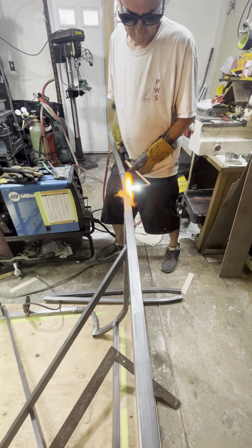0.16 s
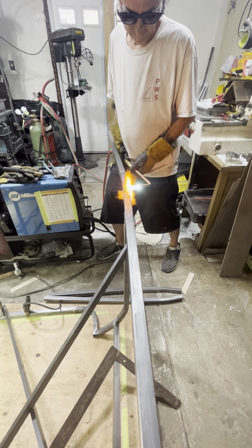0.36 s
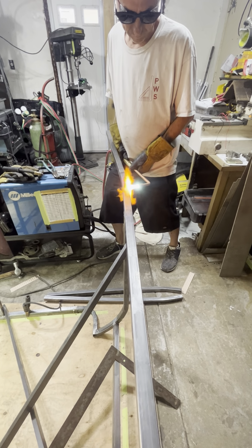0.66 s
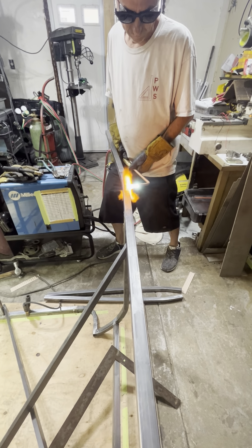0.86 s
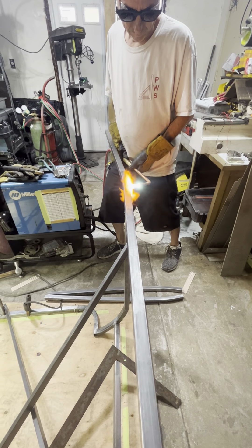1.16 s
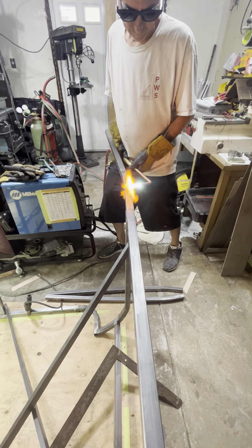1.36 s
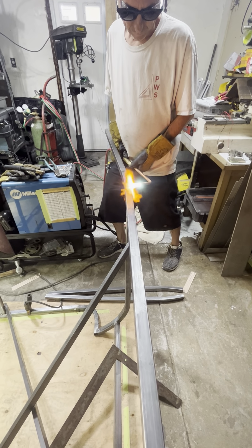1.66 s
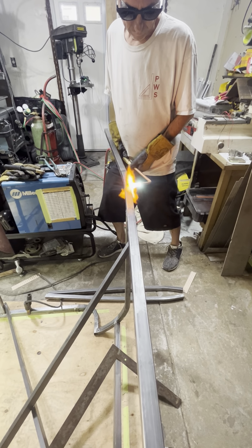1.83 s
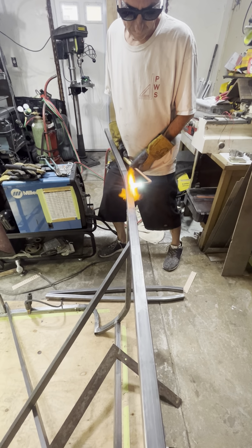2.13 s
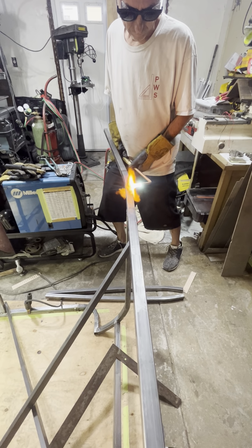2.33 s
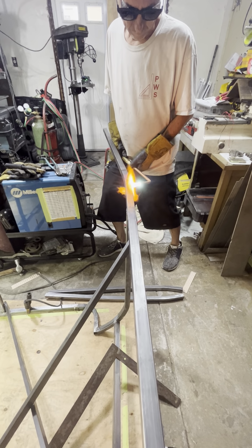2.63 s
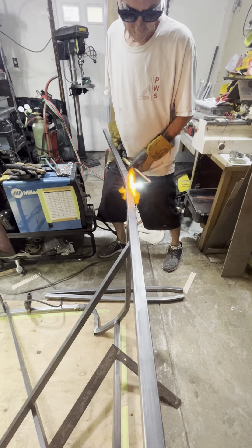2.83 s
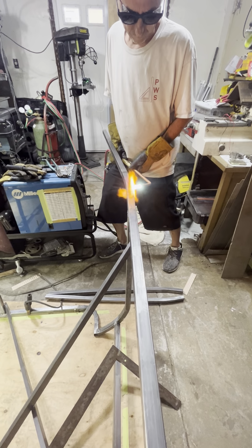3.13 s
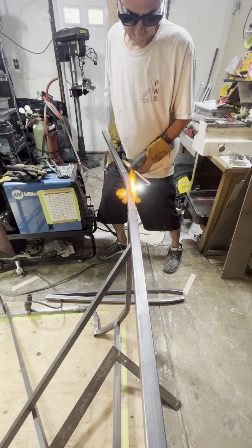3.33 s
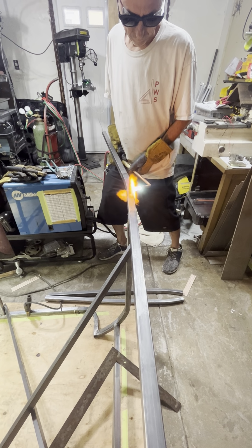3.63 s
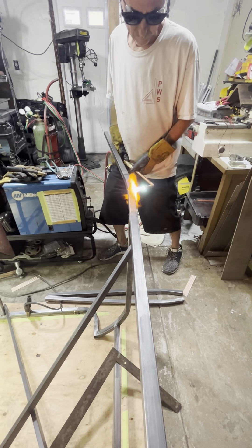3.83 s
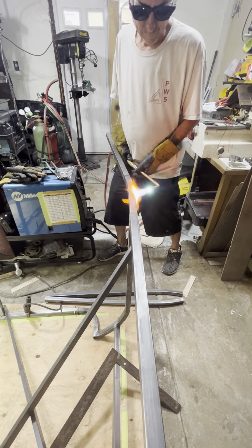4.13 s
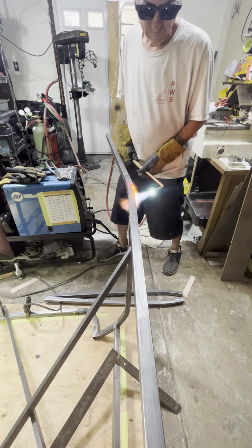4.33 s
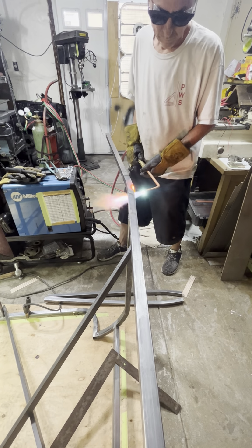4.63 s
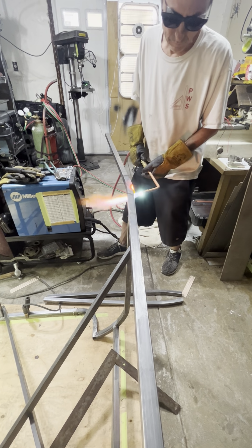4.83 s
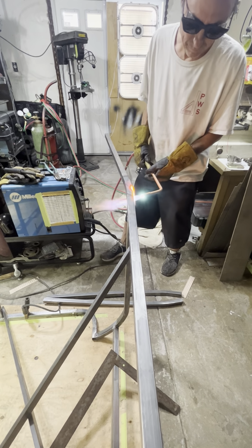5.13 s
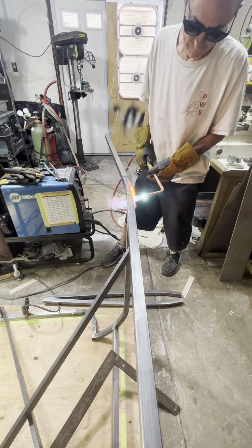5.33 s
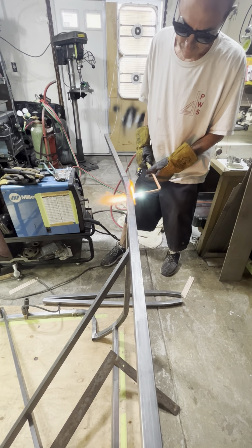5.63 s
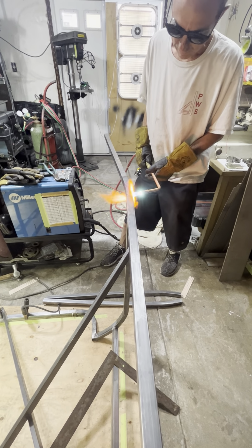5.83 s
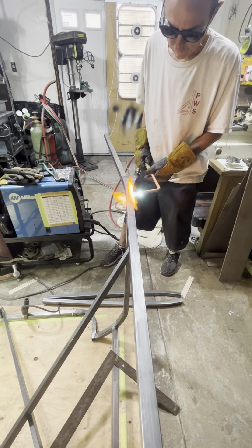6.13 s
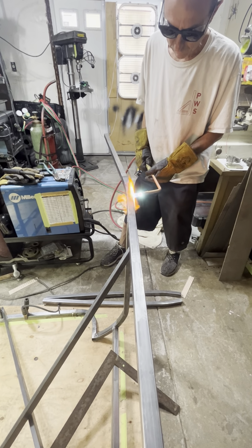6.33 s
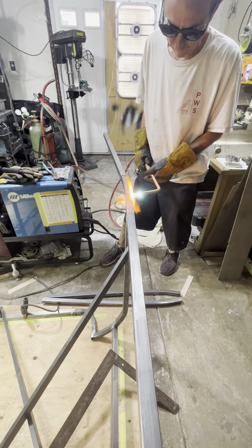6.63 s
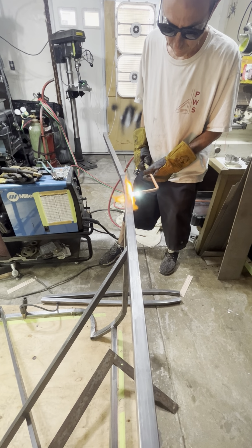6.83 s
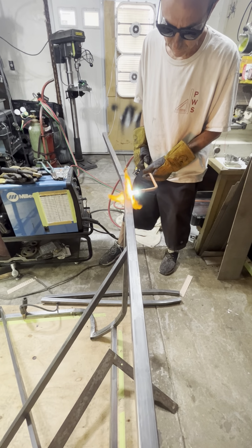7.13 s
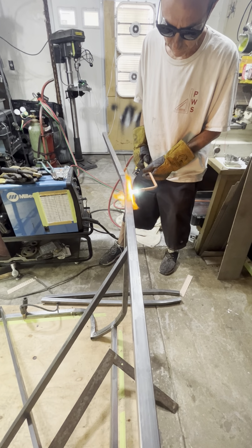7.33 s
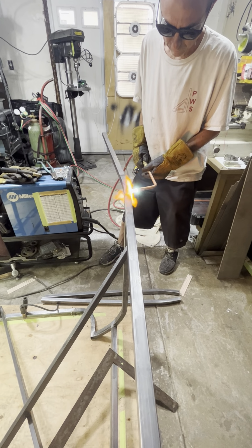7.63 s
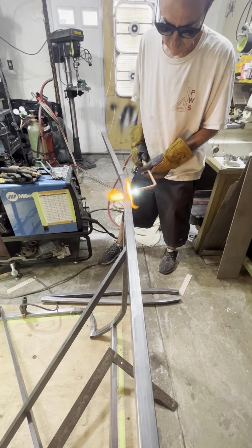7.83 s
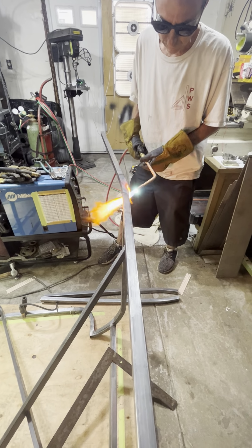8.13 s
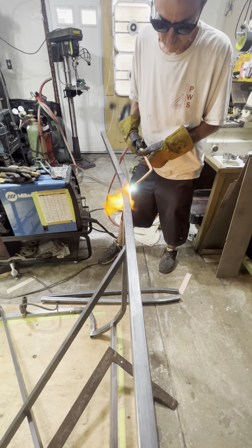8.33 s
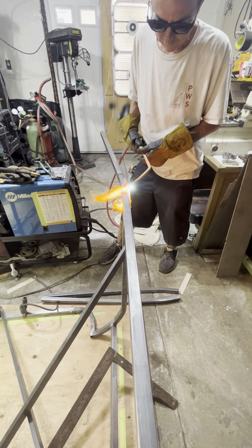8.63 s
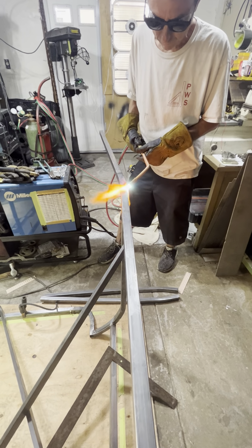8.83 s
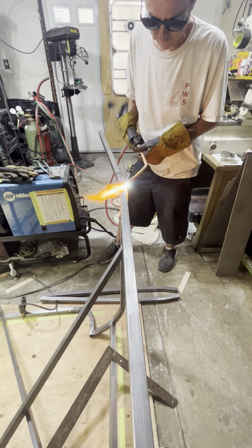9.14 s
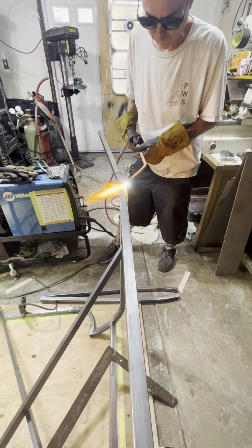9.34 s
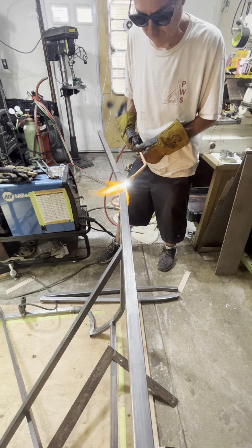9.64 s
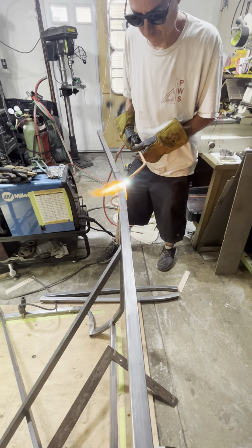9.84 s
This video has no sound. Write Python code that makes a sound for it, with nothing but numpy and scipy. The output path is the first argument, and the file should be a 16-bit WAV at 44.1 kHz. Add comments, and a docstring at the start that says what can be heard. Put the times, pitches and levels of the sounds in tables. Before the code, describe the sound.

From the start a gas torch burns without pause: a wide, bright hiss and airy fizz over a soft, turbulent low roar coloured by the steel tube. In the first 1.2 s an engine outside drops in pitch, barely audible, and faint flame notes sing briefly. Shop fans hum low and waver throughout over a quiet room rumble. The sound stays even to about 3.8 s, with a slight swell near 1.9 and a thin high whistle from 2.5. Around 3.9-4.7 the flame puffs and flutters, growing fuller; at 5.0 and 5.6 it tears harshly, then settles by 6.3. A dim engine drone creeps upward afterwards. At 8.1 a short, strong rough surge, then a puff and spits at 8.3-8.5, the sharpest at 8.9 and 9.1, a puff near 9.4 and a softer spit at 9.8. Stereo phone pickup, short metallic reflections.

```python
"""A gas torch heats a steel tube in a metal workshop, heard by a phone with two microphone ports.
The nozzle's hiss is shaped noise, coloured anew by floor and benches as the torch moves, at times with a thin whistle.
The flame is layered low noise that roars, more harshly when it slips over the tube's edge; gliding sines are its singing.
Behind it shop fans hum as wavering sines over a low room rumble, and an engine's drone comes and goes outside."""
import sys
import numpy as np
from scipy import signal
from scipy.fft import rfft, irfft, next_fast_len
from scipy.io import wavfile
from scipy.ndimage import map_coordinates

SR = 44100
rng = np.random.default_rng(int(sys.argv[2]) if len(sys.argv) > 2 else 0)


def to_wav(s):
    """Save 16-bit WAV."""
    ch = np.atleast_2d(s).T  # columns
    pcm = np.round(np.clip(ch, -1, 1) * 32767)  # PCM
    wavfile.write(sys.argv[1], SR, pcm.astype(np.int16))


N = 439677

# how the phone's two ports differ: (pitch_hz, coherence 0-1, left_lead_rad, left_minus_right_db)
PORTS = [(60, .98, -.1, -.7), (200, .97, -.22, -1.8), (430, .89, -.6, -1.6), (600, .62, -1.6, -3.6),
         (740, .15, -1.9, -3.6), (880, .45, -3.5, -2), (1000, .47, -4.6, -2.6), (1450, .69, -5.3, 1),
         (2100, .62, -4.5, 3.2), (2400, .88, -3.45, .9), (2530, .96, -3.17, .3), (2750, .88, -3.1, .3),
         (2950, .4, -3.1, 0), (3250, .12, -5, -1.6), (4200, .22, -4.3, -1.6), (4430, .64, -3.2, -.3),
         (4600, .45, -3.3, -.6), (5100, .62, -4.4, .3), (5550, .72, -3.2, .9), (6300, .66, -3, .6),
         (8000, .4, -.5, -1), (9400, .66, 2.1, 0), (10150, .995, 3.14, 0), (10700, .88, 3.7, 0),
         (11900, .86, 5.6, 0), (12450, .99, 6.28, 0), (13400, .83, 7.3, 0), (14200, .86, 8.8, 0),
         (14600, .995, 9.38, 0), (15000, .995, 9.48, 0), (15400, .78, 10.3, 0), (16000, .7, 10.8, 0)]


def amp(db):
    """Decibels to gain."""
    return 10 ** (np.asarray(db) / 20)


def unit(x):
    """x at rms 1."""
    return x / np.sqrt(np.mean(x ** 2) + 1e-20)


def along(rows, hz):
    """Each column of a table by frequency, read on a log axis."""
    f, *cols = np.transpose(rows)
    return [np.interp(np.log(hz + 1), np.log(f + 1), c) for c in cols]


def curves(rows):
    """Each column of a table by time, one value per sample."""
    s, *cols = np.transpose(rows)
    return [np.interp(np.arange(N) / SR, s, c) for c in cols]


def wobble(rate):
    """A smooth random curve, rate knots a second."""
    knots = rng.standard_normal(int(N * rate / SR) + 4)
    return map_coordinates(knots, [np.arange(N) * rate / SR])


def swell(peak, rise, fall):
    """A smooth rise from 0 to 1 at the peak, and a fall back to 0."""
    ramp = np.interp(np.arange(N) / SR, [peak - rise, peak, peak + fall], [0, 1, 0])
    return np.sin(np.pi / 2 * ramp) ** 2


def tone(hz):
    """A sine of rms 1 that follows a pitch curve."""
    cycles = np.cumsum(hz) / SR + rng.random()
    return np.sqrt(2) * np.sin(2 * np.pi * cycles)


def turbulence(spectrum, resonances=()):
    """Stereo noise of rms 1 with a slope and resonances, as the two ports pick it up."""
    size = next_fast_len(N, True)
    hz = np.fft.rfftfreq(size, 1 / SR)
    colour_db = along(spectrum, hz)[0]
    for centre, width, db in resonances:
        colour_db = colour_db + db / (1 + (2 * (hz - centre) / width) ** 2)
    alike, lead, balance_db = along(PORTS, hz)
    noise = rfft(rng.standard_normal((2, size)))
    shared, apart = noise * np.sqrt([1 + alike, 1 - alike]) * amp(colour_db)
    left = amp(balance_db / 2) * np.exp(.5j * lead)  # each port takes half of the difference
    ports = np.array([(shared + apart) * left, (shared - apart) / left])
    return unit(irfft(ports, size)[:, :N])


def reflections(x, echo_db, t60):
    """Steel, floor and benches comb the sound; each place of the torch has its own pattern."""
    # when the torch reaches each new place: (time_s)
    poses = [0, 2.2, 3.7, 4.2, 4.8, 5.5, 6.4, 7.7, 8.4, 9.9]
    t = np.arange(SR // 25) / SR
    echoes = np.zeros_like(x)
    for here in np.eye(len(poses)):
        pattern = rng.standard_normal(len(t)) * amp(-60 * t / t60) * (t > .002)  # no echo within 2 ms
        pattern = pattern / np.linalg.norm(pattern)
        nearness = np.sqrt(np.interp(np.arange(N) / SR, poses, here))  # equal-power crossfade
        echoes += nearness * signal.oaconvolve(x, pattern[None], axes=1)[:, :N]
    return unit(x + amp(echo_db) * echoes)


def shimmer(x, depth_db, width_hz, life_s):
    """The colour of the hiss flickers in narrow, short patches; the whole returns to rms 1."""
    hz, t, z = signal.stft(x, SR, nperseg=1024)
    knots = rng.standard_normal((600, 700))
    field = map_coordinates(knots, np.meshgrid(hz / width_hz, t / life_s, indexing="ij"))
    flickering = signal.istft(z * amp(depth_db * field), nperseg=1024)[1]
    return unit(flickering[:, :N])


def drone(trim_db=-1.5, throb_db=1, fade_s=.06):
    """An engine outside changes speed; only its firing note, a gliding sine, gets through the walls."""
    # the engine runs down: (time_s, pitch_hz, level_before_trim_db)
    running_down = [(0.0, 78, -39), (0.3, 77, -40), (0.38, 76, -34.5), (0.6, 75, -36.5), (0.7, 74.6, -48),
                    (0.77, 68, -38), (0.85, 68.2, -37), (0.89, 66, -56), (0.95, 59.7, -41), (1.02, 59, -41),
                    (1.16, 59, -51)]
    # later it creeps up: (time_s, pitch_hz, level_before_trim_db)
    creeping_up = [(6.32, 43.5, -53), (6.45, 50.1, -37), (6.52, 50, -44), (6.83, 47.6, -39),
                   (7.3, 49.2, -41.5), (7.75, 50.6, -41), (7.84, 51, -55), (8.04, 53.2, -45),
                   (8.4, 54.6, -40.5), (9.22, 58.2, -43.5), (9.35, 58.5, -53), (9.62, 57.8, -43),
                   (9.8, 58.5, -55)]
    t = np.arange(N) / SR
    note = np.zeros(N)
    for rows in (running_down, creeping_up):
        hz, db = curves(rows)
        present = np.clip(1 + np.minimum(t - rows[0][0], rows[-1][0] - t) / fade_s, 0, 1)
        note += present * amp(db + trim_db + throb_db * wobble(11)) * tone(hz)
    return note


def fans(unsteady_db=1.3, left_db=-1.0, room_db=-50.5):
    """Blade tones of the shop's fans, wavering in pitch and strength, over the low rumble of the room."""
    # blade tone of each fan: (pitch_hz, mean_level_db, waver_hz)
    blades = [(166, -45, 2.11), (194.9, -44, 1.35), (424, -49, 3.02)]
    # slow swell of the two lower fans: (time_s, lowest_fan_db, middle_fan_db)
    hum_level = [(0, -3, -7), (.5, -4, -1), (.78, 6, -1), (1.1, -1, 2.5), (1.95, -9, -2), (2.25, 3, 2),
                 (2.75, -2, 2.5), (3.1, 5.5, 3.5), (3.7, 0.5, -3), (4.2, 3, 3), (5.05, 4.5, 0),
                 (5.3, -4, 3.5), (5.55, 4, 1), (5.95, -6, 2.5), (6.5, -1, 0), (7, 2, 4), (7.35, -4, -4),
                 (7.7, 3, -3), (8.05, -9, 3.5), (8.45, -1, -7), (9.1, -8, 1.5), (9.4, 2, 0), (9.9, 0, -3)]
    # colour of the room's rumble: (pitch_hz, relative_db_per_hz)
    room = [(20, -24), (32, -20), (48, -1), (70, -10), (110, -8.5), (250, -28), (1000, -70)]
    levels = curves(hum_level) + [0]  # the highest fan has no slow swell
    hum = np.zeros(N)
    for (hz, db, waver_hz), level in zip(blades, levels):
        strength = amp(db + level + unsteady_db * wobble(5))
        hum += strength * tone(hz + waver_hz * wobble(9))
    return hum * amp([[left_db], [-left_db]]) + amp(room_db) * turbulence(room)


def singing(edge_s=.04):
    """For a moment the flame locks onto a resonance: a faint note comes in, glides a little and stops."""
    # sung notes: (start_s, length_s, first_pitch_hz, last_pitch_hz, level_db, left_lead_rad, left_minus_right_db)
    sung = [(0.08, 0.22, 2190, 2110, -48, 2, 5), (0.57, 0.28, 343, 364, -39.8, -.2, -3),
            (0.59, 0.15, 704, 716, -44, .3, 0), (0.81, 0.3, 708, 697, -42, .9, 1),
            (1.11, 0.16, 698, 700, -46, .9, 1), (2.88, 0.29, 713, 692, -43, .3, 2),
            (3.98, 0.15, 2160, 2200, -50, 1.8, 5), (4.85, .28, 712, 702, -45, .8, 1),
            (5.53, .11, 704, 698, -46, .8, 1), (6.98, 0.6, 2185, 2195, -54, 1.9, 5)]
    t = np.arange(N) / SR
    notes = np.zeros((2, N))
    for s, length, hz, end_hz, db, lead, pan_db in sung:
        glide = np.interp(t, [s, s + length], [hz, end_hz])
        pitch = glide * (1 + 2.5e-6 * hz * wobble(70))  # higher notes tremble more
        phase = 2 * np.pi * np.cumsum(pitch) / SR
        present = np.clip(np.minimum(t - s, s + length - t) / edge_s + .5, 0, 1)
        loudness = present * amp(db + wobble(23))
        balance = amp([[pan_db / 2], [-pan_db / 2]])
        notes += np.sqrt(2) * loudness * balance * np.sin([phase, phase - lead])
    return notes


def whistles(edge_s=.2):
    """At some angles the jet whistles thinly on the steel: a narrow band of noise that comes and goes."""
    # whistling bands: (start_s, length_s, pitch_hz, rough_width_hz, level_db)
    bands = [(0.1, .45, 2290, 202, -47), (2.5, 1.25, 6030, 90, -46.5), (5.8, 2.2, 8270, 109, -47),
             (8.2, 1.7, 12200, 109.6, -44)]
    t = np.arange(N) / SR
    out = np.zeros((2, N))
    for s, length, hz, width_hz, db in bands:
        present = np.clip(np.minimum(t - s, s + length - t) / edge_s + .5, 0, 1)
        band = (wobble(width_hz) + 1j * wobble(width_hz)) * np.exp(2j * np.pi * hz * t)
        lead = along(PORTS, hz)[1]
        out += amp(db) * present * unit(np.real([band, band * np.exp(-1j * lead)]))
    return out


def jet(hiss_shimmer_db=2, fizz_shimmer_db=1.5, flicker_db=.22):
    """Gas rushes from the nozzle, fizzes where it strikes the hot steel, and spits when it hits squarely."""
    # colours of hiss, fizz and spitting spray: (pitch_hz, relative_db_per_hz)
    hiss_colour = [(500, -50), (1800, -16.5), (2300, -5.8), (2650, -6.6), (3100, -8.4), (3900, -7),
                   (4350, -7), (5000, -2.1), (6100, 0), (6600, -.5), (7400, -3.2), (8400, -2.8),
                   (11000, -7), (16000, -15)]
    fizz_colour = [(2000, -50), (6000, -16), (8000, -8), (9500, -3.2), (10900, 0), (11950, -1.4),
                   (12350, .6), (12700, -1.2), (14000, -.3), (15000, -2.4), (16000, -2)]
    spray_colour = [(3000, -45), (6500, -2), (8400, -3), (9200, -4.5), (10800, 4.5), (12400, 2), (14000, 2),
                    (16000, -4)]
    # the nozzle as the torch is slowly turned: (time_s, hiss_level_db, fizz_level_db)
    nozzle = [(0.25, -32, -30.5), (1.2, -32.5, -29.5), (2.35, -32.5, -30), (3.35, -32, -31.5),
              (3.9, -32, -30.5), (4.25, -32, -28), (4.68, -31.9, -29.5), (4.95, -30.2, -28),
              (5.3, -31.5, -28.9), (6.1, -31, -29), (6.9, -31.5, -30.5), (7.5, -30.9, -30.5),
              (8.1, -31, -29), (8.75, -31.5, -28), (9.35, -32, -29.5), (9.55, -31.5, -28.5),
              (9.95, -32.5, -30.5)]
    # the jet strikes the steel squarely and spits: (peak_s, rise_s, fall_s, peak_level_db)
    spits = [(5.02, .1, .16, -38), (8.33, 0.09, 0.11, -31), (8.46, 0.12, 0.12, -28.5),
             (8.93, 0.078, 0.1, -24), (9.105, 0.082, 0.13, -27), (9.8, 0.15, 0.1, -33)]
    hiss_db, fizz_db = curves(nozzle)
    spit = sum(amp(db) * swell(s, rise, fall) for s, rise, fall, db in spits)
    hiss = reflections(turbulence(hiss_colour), echo_db=-5, t60=.1)
    fizz = reflections(turbulence(fizz_colour), echo_db=-7, t60=.07)
    spray = reflections(turbulence(spray_colour), echo_db=-7, t60=.07)
    hiss = shimmer(hiss, hiss_shimmer_db, width_hz=170, life_s=.06)
    fizz = shimmer(fizz, fizz_shimmer_db, width_hz=400, life_s=.05)
    flicker = amp(flicker_db * wobble(20))
    return flicker * (hiss * amp(hiss_db) + fizz * amp(fizz_db) + spray * spit)


def flame(flutter_db=0.41, tear_flutter_db=0.8, restless_db=0.28):
    """Turbulent burning: a soft slip feeds the rumble, a harsh one the tearing; roar and flutter grow with both."""
    # resonances of tube and shop, and the gaps between: (pitch_hz, width_hz, boost_db)
    body = [(103, 8, 1), (111, 6, -3), (134, 14, 4), (207, 8, -3), (254, 7, -5), (264, 8, 4), (292, 10, 5),
            (332, 10, 5), (380, 30, -5.5), (436, 45, 5.5), (486, 14, 4), (514, 16, -6), (533, 18, 5.5),
            (586, 20, 5), (648, 16, -2.5), (684, 14, -3), (704, 16, 2), (723, 12, -4.5), (775, 30, 1.3),
            (814, 16, 2.8), (842, 28, -4), (890, 80, -1.3), (1040, 55, 3.6), (1245, 30, -1.5),
            (1305, 40, 3), (1335, 20, -3.5), (1356, 18, 4), (1432, 20, -2)]
    # further resonances where the flame tears on the tube's edge: (pitch_hz, width_hz, boost_db)
    edge = [(875, 40, 3.5), (955, 30, -2.5), (995, 30, 2.5), (1275, 40, 2), (1385, 25, 2), (1465, 35, -2.5),
            (1525, 50, 2)]
    # colours of rumble, roar, tearing and billowing: (pitch_hz, relative_db_per_hz)
    rumble_colour = [(40, -26), (72, -9), (100, -4), (160, 1), (270, -1.5), (400, -7.5), (800, -43),
                     (2000, -68)]
    roar_colour = [(80, -44), (220, -21.5), (330, -2.5), (450, -1), (600, -3), (760, -2), (1000, -10.5),
                   (1600, -26), (3000, -56), (8000, -80)]
    tear_colour = [(100, -12), (350, -13.5), (600, -4.5), (950, 0.5), (1300, -1.5), (1800, -3.5),
                   (2400, -7.5), (3200, -96), (6000, -34), (12000, -60)]
    billow_colour = [(50, -28), (75, -8), (100, -4), (125, -11), (180, -19), (400, -64)]
    # slow level of the deep rumble: (time_s, change_db)
    depth_curve = [(0, -0.5), (.55, 0), (.7, 0.5), (2.3, 0.1), (3.4, -1), (3.65, -2), (4.2, -.5), (6.4, -1),
                   (7, -0.5), (7.4, -2.5), (8, -1.5), (8.7, -2), (10, -1)]
    # the flame slips over the tube's edge: (peak_s, rise_s, fall_s, strength_db, harshness 0-1)
    slips = [(1.85, .5, 0.5, 1.5, 0), (4.55, 0.85, 0.73, 3.5, 0), (5.04, 0.54, 0.62, 4, 0.65),
             (5.62, 0.47, 0.68, 2, 0.77), (8.09, 0.27, 0.28, 7.5, 0.48)]
    # the flame catches on the edge and puffs, or falters below 0 dB: (peak_s, rise_s, fall_s, strength_db)
    puffs = [(2.2, .06, .08, 1), (3.9, 0.12, 0.11, 2.5), (4.19, 0.06, 0.09, 2.5), (4.38, .04, 0.065, 3),
             (4.51, .04, .05, 1.5), (4.64, .06, .09, 2), (4.3, .04, .05, -3), (4.885, .04, 0.077, 2),
             (5.1, .04, .07, 0), (5.56, .06, 0.098, 1), (7.945, .015, 0.024, 3), (8.37, 0.09, 0.09, 5),
             (9.36, 0.11, 0.094, 3)]
    # levels of the steady flame on the steel
    rumble_db, roar_db, tear_db, billow_db = -36.5, -35, -41.5, -54
    # dB gained per dB of harsh slip (tearing) and of any slip (billowing)
    tear_grows, billow_grows = 2.35, 1.7
    fade_db_per_s = 0.12  # the roar fades as the work goes on

    surges = np.array([db * swell(s, rise, fall) for s, rise, fall, db, _ in slips])
    surge = surges.sum(axis=0)
    harsh = np.array([row[-1] for row in slips]) @ surges
    depth, = curves(depth_curve)
    drift = restless_db * wobble(4) - fade_db_per_s * np.arange(N) / SR
    flutter = wobble(30) * amp(surge / 2)
    puff = sum(db * swell(s, rise, fall) for s, rise, fall, db in puffs)

    rumble_gain = amp(rumble_db + depth + surge - harsh + puff + flutter_db * flutter)
    rumble = rumble_gain * turbulence(rumble_colour, body)
    roar_gain = amp(roar_db + drift + surge + puff + flutter_db * flutter)
    roar = roar_gain * turbulence(roar_colour, body)
    tear_gain = amp(tear_db + tear_grows * harsh + tear_flutter_db * flutter)
    tear = tear_gain * turbulence(tear_colour, body + edge)
    # the deep flapping of the free flame
    billow = amp(billow_db + billow_grows * surge + puff) * turbulence(billow_colour)
    return rumble + roar + tear + billow


def scene():
    """The torch over the shop's background."""
    return drone() + fans() + singing() + whistles() + jet() + flame()


def record(dry, top_hz=15720):
    """The phone keeps nothing above its band limit."""
    size = next_fast_len(N + SR // 4, True)
    kept = np.fft.rfftfreq(size, 1 / SR) < top_hz
    return irfft(rfft(dry, size) * kept, size)[:, :N]


dry = scene()
out = record(dry)
to_wav(out)
```